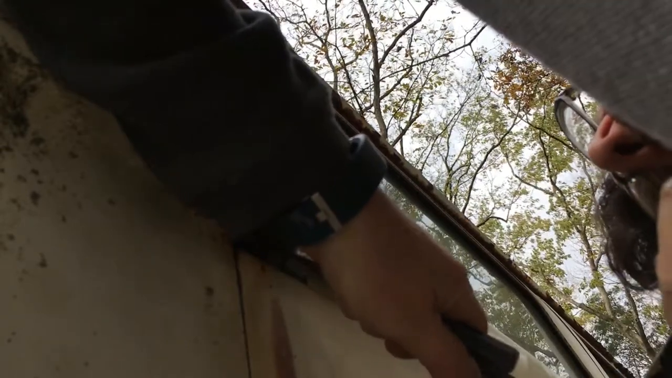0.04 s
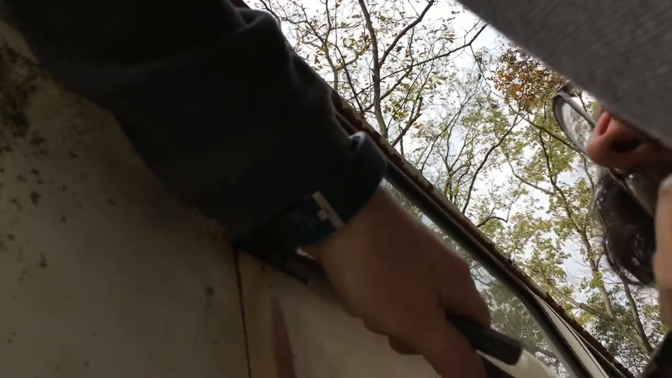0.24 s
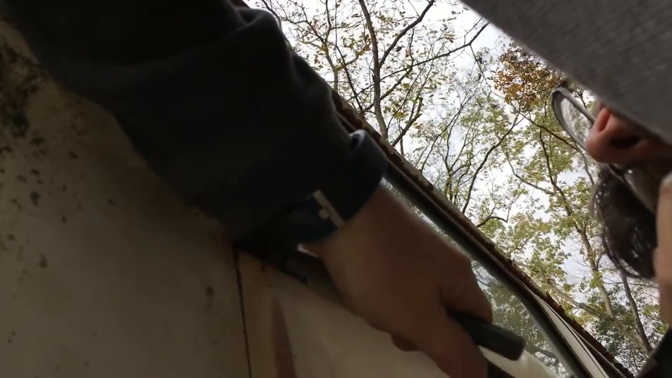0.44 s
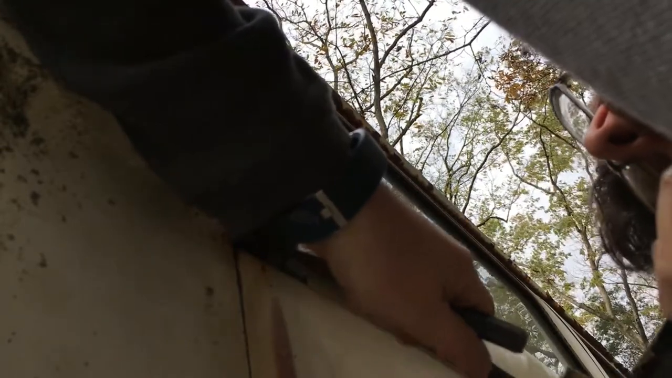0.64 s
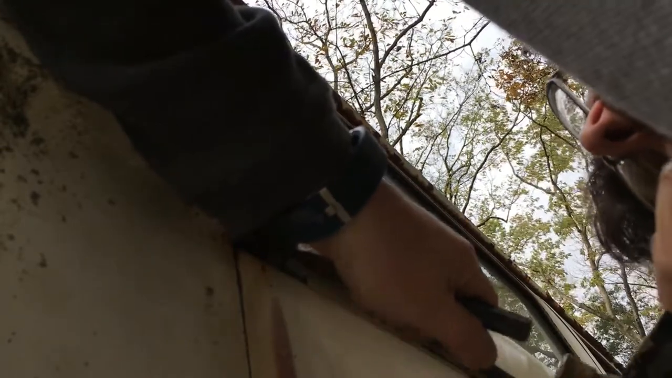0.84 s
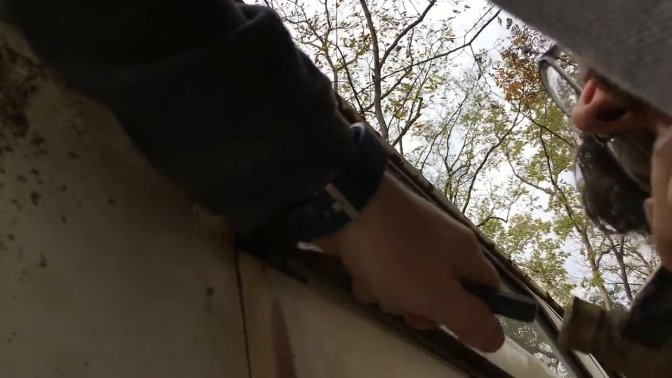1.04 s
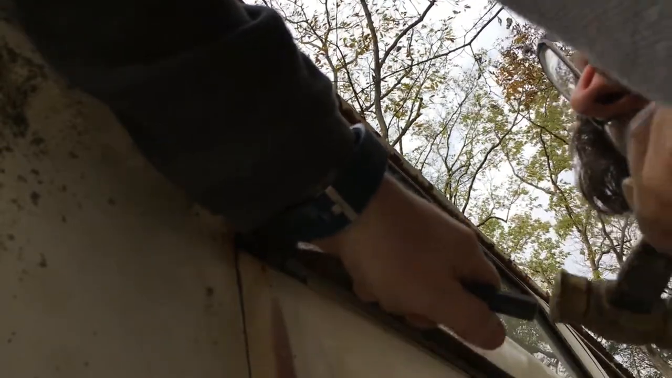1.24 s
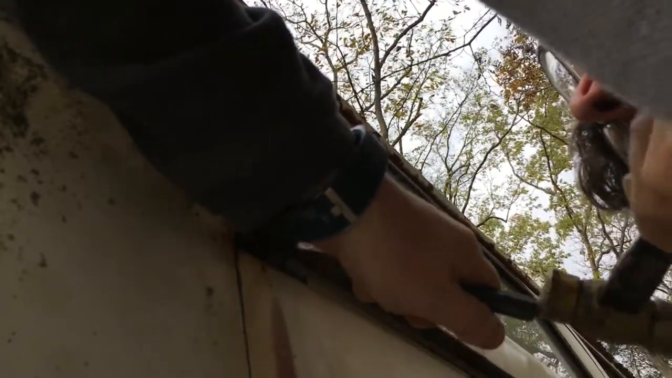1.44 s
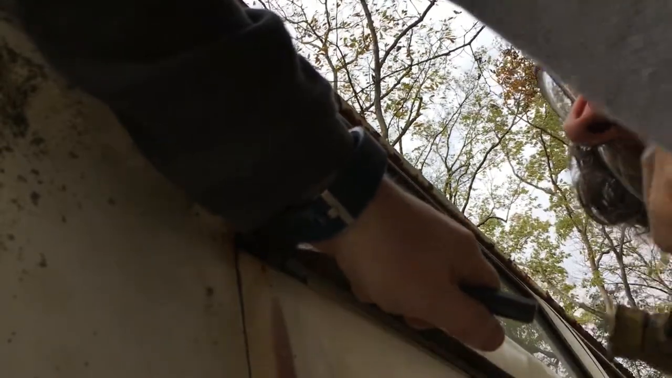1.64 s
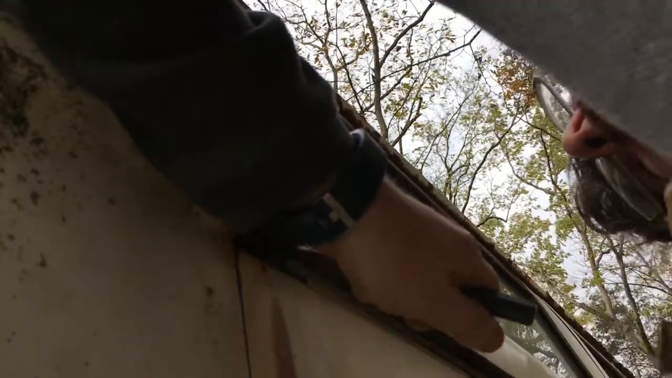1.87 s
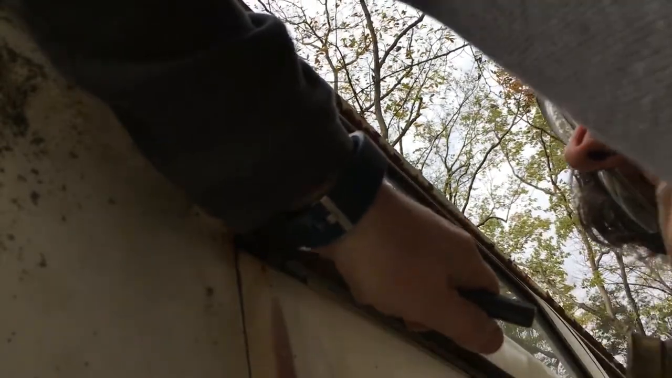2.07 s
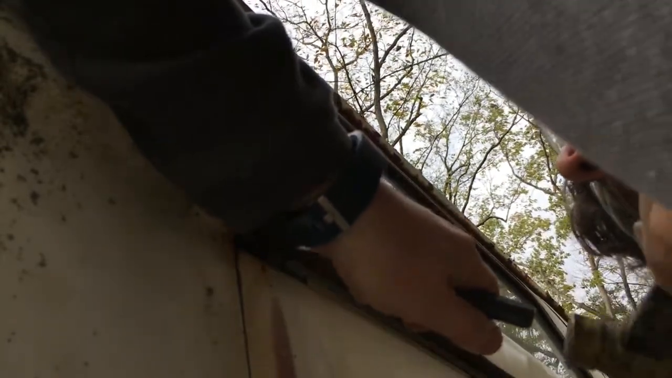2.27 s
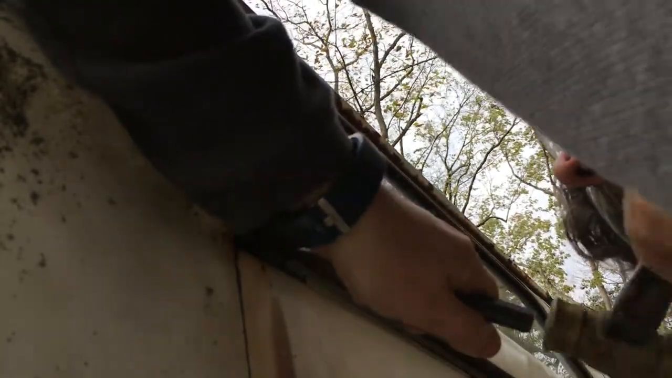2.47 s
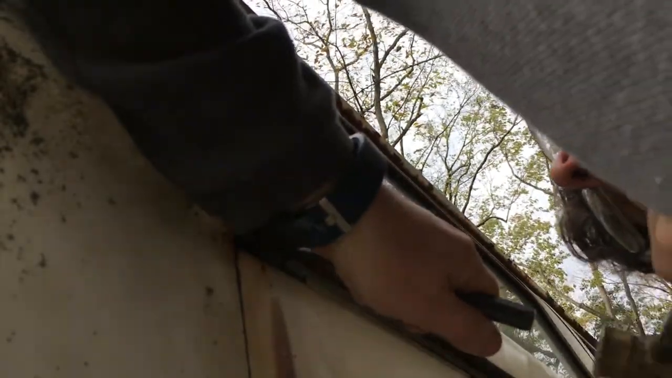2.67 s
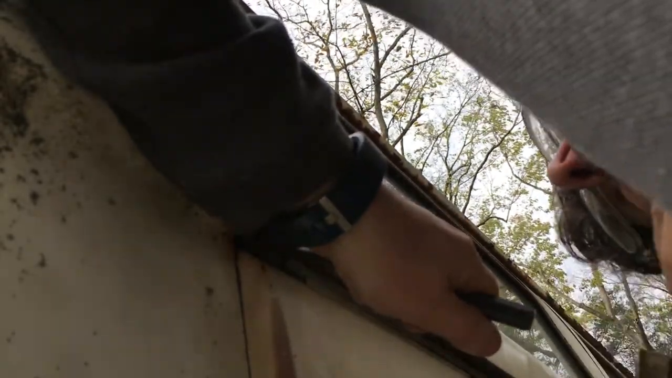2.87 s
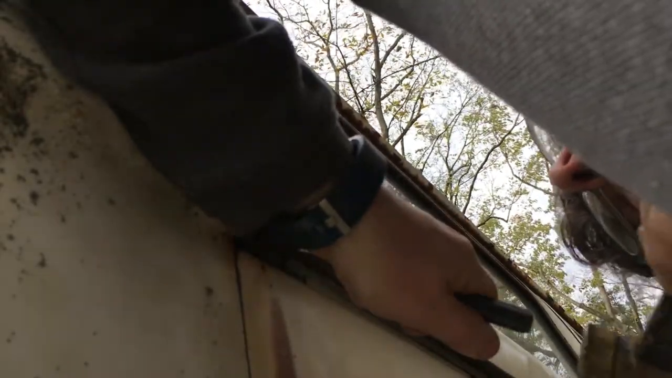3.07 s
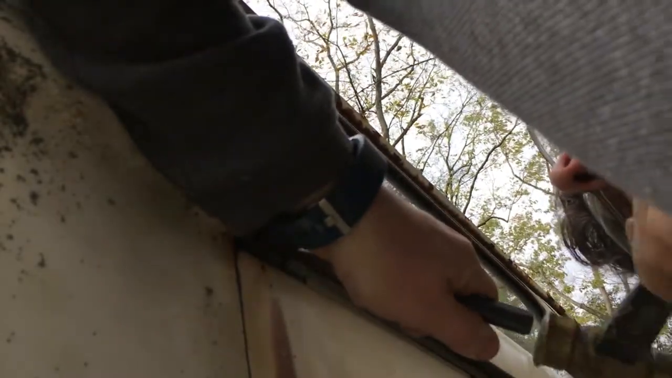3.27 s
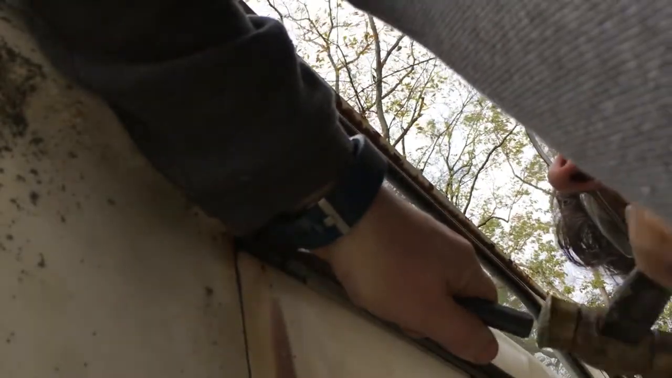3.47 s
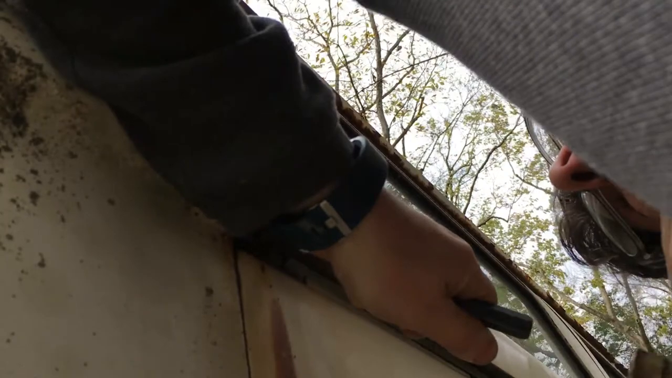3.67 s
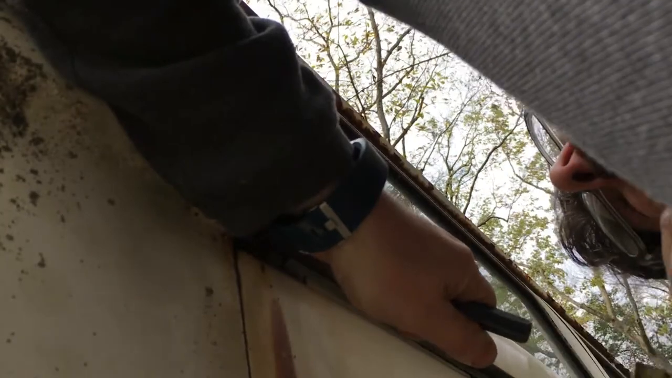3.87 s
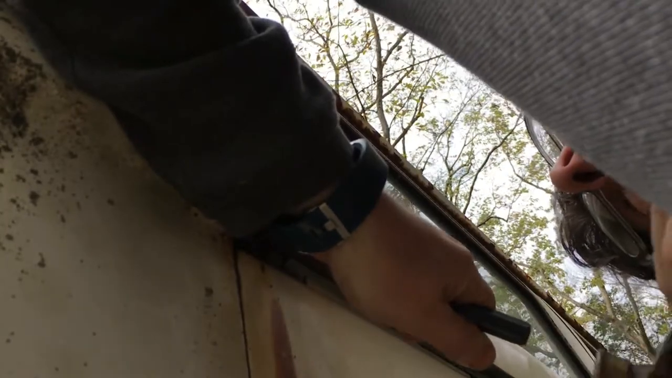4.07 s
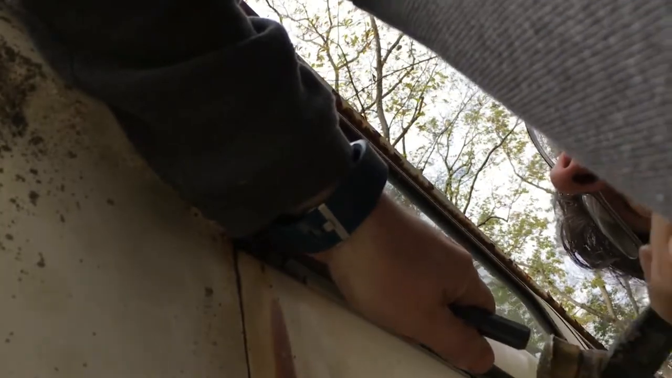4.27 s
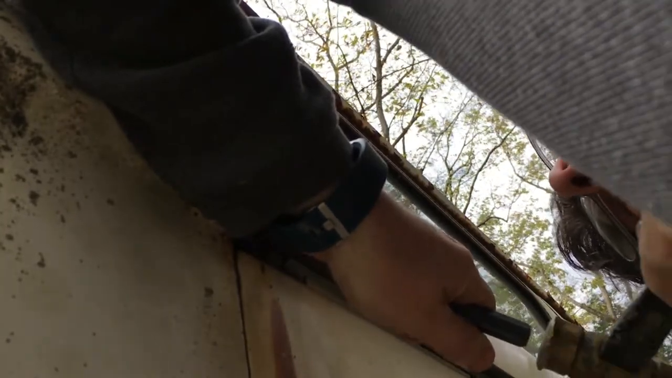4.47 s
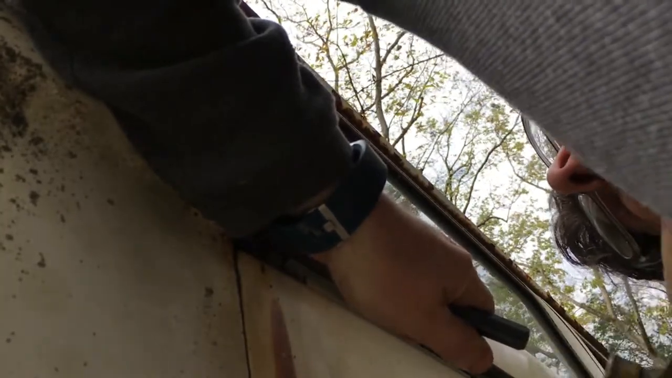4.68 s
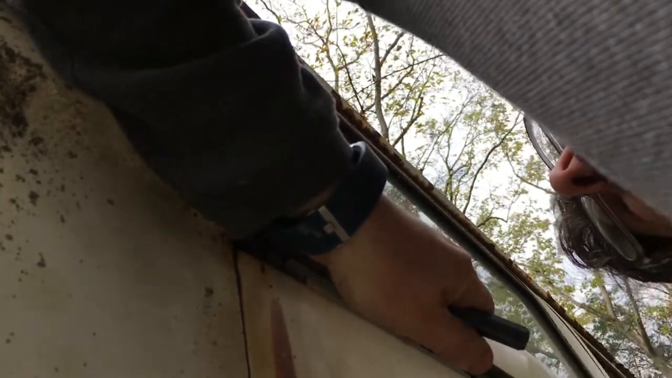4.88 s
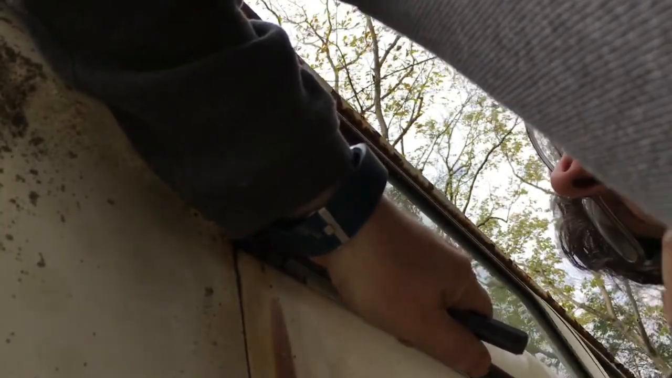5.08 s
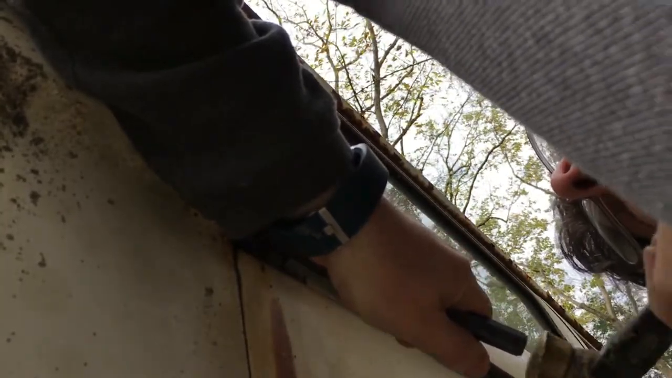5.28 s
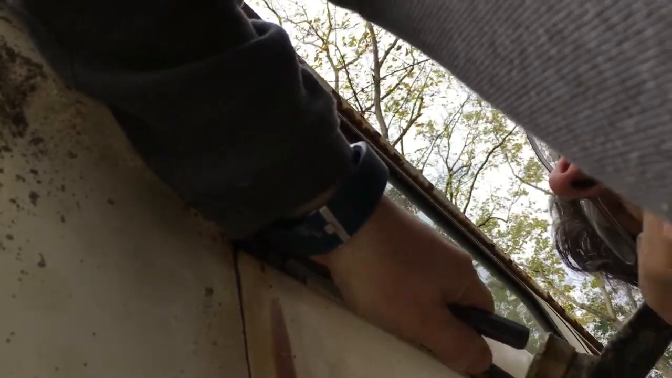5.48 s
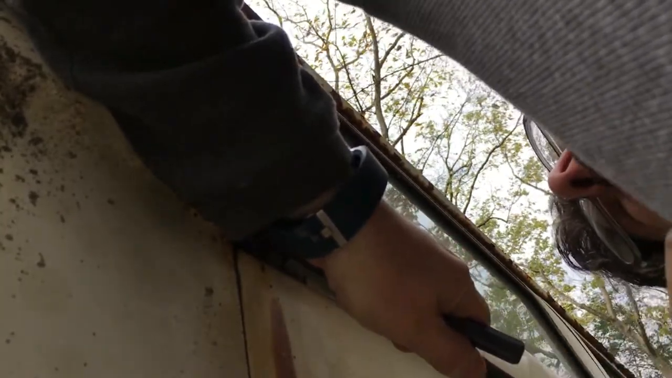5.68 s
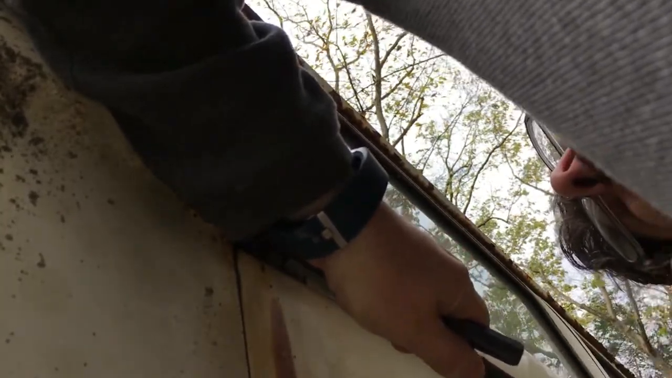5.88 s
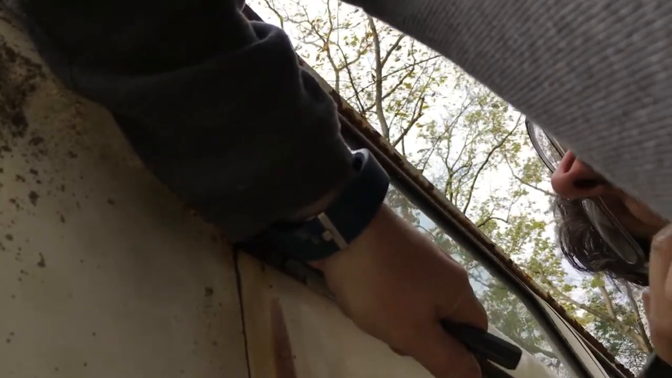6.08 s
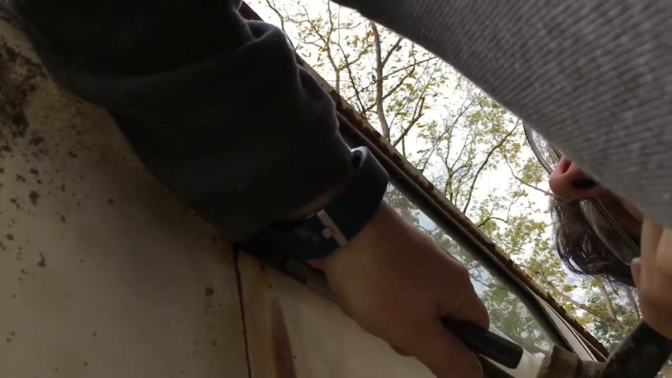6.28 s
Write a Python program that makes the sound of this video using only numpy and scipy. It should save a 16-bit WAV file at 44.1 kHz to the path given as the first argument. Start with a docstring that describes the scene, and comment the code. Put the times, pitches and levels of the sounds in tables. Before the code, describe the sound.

Close mono sound inside an old steel vehicle cab. For the first second there is only faint hiss, low rumble from the hand shifting on the microphone, and soft dull knocks as a chisel tip is set on a seized screw: barely audible at 0.15, clearer at 0.5, a muffled one at 0.6. At 1.1 the hammer lands, a looser, choked, duller blow. From 1.3 firm blows follow every quarter second, very regular and nearly equal in strength, to the last at 6.1. Each is an instant hard steel crack with a short bright chisel ring, mid-range clank of the window frame and a low hollow boom of panels, fading mostly within a quarter second. The tone brightens over the first blows; the chisel ring shifts colour around 4.5. A weak rebound tick follows the blow at 5.6. Loudest peaks are rounded by overload; the low rumble slowly eases.

```python
"""Hammering a stuck screw in a cab

Inside an old vehicle cab, a chisel is set on a seized screw in the window frame and hammered four times a second.
Each blow is a burst of shaped noise (the crack) plus many dying sines: chisel, hammer, frame and cab panels.
Soft knocks come first, as the tip is set on the screw; faint hiss and handling rumble lie underneath.
A close mono microphone is driven to its limit, so the loudest peaks are rounded off."""
import sys
import numpy as np
from scipy import signal
from scipy.fft import rfft, irfft
from scipy.io import wavfile

SR = 44100
rng = np.random.default_rng(int(sys.argv[2]) if len(sys.argv) > 2 else 0)


def output_pcm(signal):
    """Save a mono or channel-first signal as 16-bit PCM at the path in sys.argv[1].

    Samples are clipped to [-1, 1] before scaling.
    """
    pcm = np.clip(np.atleast_2d(signal).T, -1, 1) * 32767
    wavfile.write(sys.argv[1], SR, np.round(pcm).astype(np.int16))


N = 278712
TIME = np.arange(N) / SR   # the whole scene [s]
BLOW_TIME = np.arange(SR * 3 // 5) / SR   # time since one blow or touch [s]


def from_db(db):
    """Turn decibels into a plain gain."""
    return 10 ** (np.asarray(db) / 20)


def rms_one(x):
    """Scale a sound to an rms of 1."""
    return x / np.sqrt(np.mean(x ** 2) + 1e-20)


def at_time(rows, s):
    """Read a table of (time, value) at any moment."""
    return np.interp(s, *np.transpose(rows))


def at_hz(points, hz):
    """Read a table of (frequency, value) at any frequency, along a logarithmic scale."""
    table_hz, value = np.transpose(points)
    return np.interp(np.log(hz), np.log(table_hz), value)


def dying(t, t60):
    """Envelope that starts at t = 0 and falls 60 dB in t60 seconds."""
    return (t >= 0) * np.exp(-np.log(1000) * np.maximum(t, 0) / t60)


def ring(hz, t60, t):
    """A dying sine: one mode, that is one way in which a struck body can swing."""
    return dying(t, t60) * np.sin(2 * np.pi * hz * t)


def bands(lowest_hz, count):
    """Centre frequency and band-pass filter of neighbouring bands up to 17.5 kHz."""
    edges = np.geomspace(lowest_hz, 17500, count + 1)
    return [(np.sqrt(low * high), signal.butter(2, [low, high], "band", fs=SR, output="sos"))
            for low, high in zip(edges, edges[1:])]


def place(times, sounds):
    """Lay each sound on the time line at its moment."""
    out = np.zeros(N + SR)
    for s, sound in zip(times, sounds):
        start = round(s * SR)
        out[start:start + np.size(sound)] += sound
    return out[:N]


def steady_noise(spectrum):
    """Noise with the given colour, rms 1."""
    hz = np.maximum(np.fft.rfftfreq(N, 1 / SR), 1)
    coloured = rfft(rng.standard_normal(N)) * from_db(at_hz(spectrum, hz))
    return rms_one(irfft(coloured, N))


# hammer blows, with one light rebound: (time [s], strength [dB], looseness of the contact [0-1])
HAMMER_BLOWS = [(1.0951, -1.5, 0.9), (1.3194, -0.7, 0.07), (1.571, -0.6, 0), (1.8128, 0, 0),
                (2.0668, -0.4, 0), (2.322, -0.5, 0.05), (2.575, -0.8, 0.1), (2.831, -1, 0.13),
                (3.086, -1.1, 0), (3.3443, -1.5, 0), (3.5933, -1.5, 0.06), (3.8455, -1, 0),
                (4.0809, -0.45, 0.05), (4.3327, -0.94, 0), (4.5793, -1.5, 0), (4.8375, -1, 0.03),
                (5.0925, -1.5, 0), (5.3444, -1.86, 0), (5.5846, -1.1, 0), (5.632, -9.5, 1),
                (5.8477, -1.5, 0), (6.1046, -0.1, 0.1)]


def blow_times():
    """Moments at which the hammer lands [s]."""
    return np.array(HAMMER_BLOWS)[:, 0]


# a fully loose chisel passes on less boom and less treble: (frequency [Hz], level change [dB])
LOOSE_CONTACT_COLOUR = [(110, -6.5), (250, -1), (450, 4.5), (1000, -4), (2000, -0.5), (4200, -0.5),
                        (9500, -13)]
# blow by blow the tip bites into the screw and the sound brightens; colour at first
# and once bitten in, both: (frequency [Hz], level change [dB])
FIRST_BLOW_COLOUR = [(250, 0), (1200, -1.04), (4200, 1), (9500, -6)]
BITTEN_IN_COLOUR = [(250, -0.17), (1200, 0.2), (4200, -0.26), (9500, 3)]
BITE_S = 1.5   # time constant of the change


def force_db(hz):
    """How strongly each blow drives a frequency: its strength, the bite of the tip, the firmness of the contact."""
    times, strength_db, loose = np.transpose(HAMMER_BLOWS)
    fresh = np.exp(-(times - times[0]) / BITE_S)
    bite_db = fresh * at_hz(FIRST_BLOW_COLOUR, hz) + (1 - fresh) * at_hz(BITTEN_IN_COLOUR, hz)
    return strength_db + bite_db + loose * at_hz(LOOSE_CONTACT_COLOUR, hz)


FIRM_DAMPING_DB_PER_S = 11.5
LOOSE_EXTRA_DAMPING_DB_PER_S = 180   # added when the contact is fully loose


def hand_damping():
    """The hand damps every blow a little, on top of its own fading; a loose contact chokes it much sooner."""
    loose = np.array(HAMMER_BLOWS)[:, 2:]
    db_per_s = FIRM_DAMPING_DB_PER_S + LOOSE_EXTRA_DAMPING_DB_PER_S * loose ** 2
    return from_db(-db_per_s * BLOW_TIME)


def struck(modes, level_db, scatter_db, lag_s):
    """Every blow rings the same modes, a little differently; neighbouring modes swing in opposite senses."""
    rings = [(-1) ** k * ring(hz, t60, BLOW_TIME - lag_s) for k, (hz, db, t60) in enumerate(modes)]
    mode_db = np.array([level_db + db + force_db(hz) for hz, db, t60 in modes]).T   # blows by modes
    chance_db = scatter_db * rng.standard_normal(mode_db.shape)
    return from_db(mode_db + chance_db) @ np.array(rings)


# chisel and screw: (frequency [Hz], relative level as first seated [dB], relative level once reseated [dB],
# time to fall 60 dB if left undamped [s])
CHISEL_MODES = [(2443, -22.5, -17.5, 0.11), (2580, -50, -44, 0.037), (3110, -31, -34.5, 0.15),
                (3245, -22.5, -13, 0.067), (3437, -15, -12, 0.04), (3730, -17, -16.5, 0.05),
                (4140, -36, -34, 0.03), (4270, -22.5, -18.5, 0.078), (4611, -13, -16.5, 0.048),
                (5320, -12.5, -64, 0.028), (5520, -17.5, -35.5, 0.068), (5780, -28.5, -6.5, 0.056),
                (6060, -33, -13, 0.084), (5980, -40, -21, 0.037), (6450, -16, -39, 0.052),
                (7030, -40, -54.5, .07), (7660, -45.5, -9.5, 0.065), (8230, -26, -34, 0.1),
                (11000, -34, -41, 0.11)]
# how far the chisel has shifted to its new seat: (time [s], share [0-1])
CHISEL_SEAT = [(1.1, 0.12), (4.0, 0), (4.6, 0.73), (5.6, 0.67), (6.1, 0.4)]


def chisel(level_db, scatter_db, detune):
    """The modes shift in balance as the tip moves in the screw, and in pitch with the grip of the hand."""
    seat = at_time(CHISEL_SEAT, blow_times())
    out = np.zeros((len(HAMMER_BLOWS), len(BLOW_TIME)))
    t = BLOW_TIME[:SR // 5]   # these short rings need only 0.2 s
    for k, (hz, first_db, reseated_db, t60) in enumerate(CHISEL_MODES):
        loudness, grip = rng.standard_normal((len(HAMMER_BLOWS), 2)).T
        seated_db = first_db + seat * (reseated_db - first_db)
        strength = from_db(level_db + seated_db + force_db(hz) + scatter_db * loudness)
        pitch_hz = hz * (1 + detune * grip[:, None])
        out[:, :len(t)] += (-1) ** k * strength[:, None] * ring(pitch_hz, t60, t)
    return out


# hammer head and other loose steel:
# (frequency [Hz], relative level [dB], time to fall 60 dB if left undamped [s])
HAMMER_MODES = [(1355, -41, 0.3), (1420, -55, 0.46), (1690, -38.5, 0.38), (1980, -44, 0.27),
                (2560, -43.5, 0.24), (4330, -43, 0.3), (4520, -47, 0.33), (5700, -43, 0.24),
                (5570, -54, 0.29), (6200, -55, 0.31), (7000, -51, 0.23), (8100, -53, 0.28),
                (8600, -63, 0.33)]


def hammer():
    """Faint lasting ring of the hammer head and other loose steel: a set of dying sines."""
    return struck(HAMMER_MODES, level_db=-3.0, scatter_db=5.5, lag_s=0.0003)


def plate():
    """Undamped ring of a large steel sheet, with modes f = a m^2 + b n^2: the same for every blow."""
    m, n = np.mgrid[1:100, 1:100]   # how many half-waves fit along each side
    hz = 1.9 * m ** 2 + 3.7 * n ** 2
    # a mode swings one way or the other
    sense = np.sign(np.sin(0.71 * m) * np.sin(1.13 * n) * np.sin(1.37 * m) * np.sin(1.79 * n))
    lines = np.bincount(hz.astype(int).ravel(), sense.ravel())[:SR // 2 + 1]   # one bin per hertz
    return rms_one(irfft(-1j * lines, SR)[:len(BLOW_TIME)])   # -1j makes every mode a sine


# steel meets steel: (frequency [Hz], relative level [dB])
CRACK_COLOUR = [(500, -4.5), (1500, 0.5), (3500, -6.5), (6000, -1.5), (8500, -5), (12000, -13),
                (15500, -17.5)]
# the crack thrown back by roof and doors:
# (delay [s], level against the crack [dB], tilt above 3 kHz [dB per octave])
CRACK_REFLECTIONS = [(.0056, -2.5, -4.5), (0.0109, 0.5, -9)]
# the countless weak modes of the steel: (frequency [Hz], relative level [dB])
CLATTER_COLOUR = [(200, -44), (450, -19.5), (650, -6.5), (850, -8), (1100, -8.5), (1400, -11.5), (1900, -4),
                  (2900, -12), (4500, -6), (6500, -18), (9000, -29), (12000, -27.5), (15500, -34.5)]
# how long they last: (frequency [Hz], time to fall 60 dB if left undamped [s])
CLATTER_FADE = [(300, 0.64), (700, 0.22), (2000, 0.14), (4000, 0.11), (8000, 0.12), (15000, 0.094)]
# share of the clatter's power which is alike from blow to blow: (frequency [Hz], share [0-1])
CLATTER_ALIKE = [(400, 0.66), (1800, 0.64), (3500, 0.29), (7000, 0.24), (13000, 0.39)]
# diffuse tail of the cab: (frequency [Hz], relative level [dB])
CAB_TAIL_COLOUR = [(220, 5), (360, -0.5), (520, -19), (1200, -38.5), (2000, -51), (3000, -39), (6000, -41),
                   (8000, -53), (11000, -59), (15500, -62)]


def crack_and_clatter(crack_t60, tail_t60, colour_db):
    """A short crack and its duller reflections, then the dense ring of the steel and a faint tail from the cab."""
    t, sheet, out = BLOW_TIME, plate(), 0
    noise = rng.standard_normal((2, len(HAMMER_BLOWS), len(t)))   # neighbouring bands get unrelated noise
    for k, (hz, band) in enumerate(bands(200.8, count=14)):
        octaves = max(np.log2(hz / 3000), 0)
        crack = dying(t, crack_t60)
        for delay, db, tilt_db in CRACK_REFLECTIONS:
            crack = crack + from_db(db + tilt_db * octaves) * dying(t - delay, crack_t60)
        crack = from_db(at_hz(CRACK_COLOUR, hz)) * crack
        clatter = from_db(at_hz(CLATTER_COLOUR, hz)) * dying(t, at_hz(CLATTER_FADE, hz))
        tail = from_db(at_hz(CAB_TAIL_COLOUR, hz)) * dying(t, tail_t60)
        alike = at_hz(CLATTER_ALIKE, hz)
        same_part = np.sqrt(alike) * clatter * sheet * (-1) ** k
        # unrelated sounds add up by power
        chance_level = np.sqrt(crack ** 2 + (1 - alike) * clatter ** 2 + tail ** 2)
        sound = same_part + chance_level * noise[k % 2]
        # bands that are less alike also vary more in level from blow to blow
        vary_db = colour_db * (1 - alike) * rng.standard_normal(len(HAMMER_BLOWS))
        out = out + signal.sosfilt(band, sound) * from_db(force_db(hz) + vary_db)[:, None]
    return out


# window frame: (frequency [Hz], relative level [dB], time to fall 60 dB if left undamped [s])
FRAME_MODES = [(574.3, -28, 0.19), (593.5, -13.5, 0.078), (596, -34, 0.33), (636, -22.5, 0.14),
               (673, -30, 0.2), (700, -25, 0.25), (767, -23.5, 0.14), (829.4, -16, 0.15),
               (886, -16.5, 0.11), (909.4, -19.5, 0.11), (952, -27, 0.15), (970, -21.5, 0.15),
               (1060, -30.5, 0.28), (1110, -18.5, 0.14), (1200, -44.5, 0.3), (1317.5, -30, 0.29),
               (1370, -32, 0.29), (1414, -29, 0.15), (1520, -42, 0.073), (1543, -29.5, 0.017),
               (1646, -56.5, 0.16), (1700, -33, 0.13), (1747, -24.5, 0.13), (1804, -17.5, 0.15),
               (1884, -14.5, 0.038), (1940, -35.5, 0.31), (1965, -23, 0.12), (2090, -37, 0.12),
               (2280, -32, 0.06), (2393, -21, 0.095)]


def frame():
    """Clank of the steel window frame: dying sines in the middle range."""
    return struck(FRAME_MODES, level_db=-0.53, scatter_db=1.67, lag_s=0.0004)


# sheet panels and the air in the cab, then the sway of the whole cab, both:
# (frequency [Hz], relative level [dB], time to fall 60 dB if left undamped [s])
CAB_MODES = [(55, -32.5, 0.59), (71.5, -32, 1), (92.6, -18.5, 0.32), (100.2, -18, 0.37),
             (127.8, -13.5, 0.21), (152.1, -10, 0.24), (164.9, -37.5, 2.1), (184.2, -11, 0.24),
             (209.5, -6.5, 0.17), (238.6, -8, 0.089), (247.84, -9.5, 0.29), (247.5, -17.5, 0.76),
             (258.9, -21, 0.35), (291.5, -29.5, 1.12), (302.1, -19, 0.16), (346.7, -19.5, 0.34),
             (365, -28, 0.76), (378.5, -19, 0.24), (387.4, -15, 0.17), (397.7, -40, 2.8),
             (443.5, -9, 0.038), (438.6, -15.5, 0.15), (494, -10, 0.01), (521.3, -27.5, 0.28)]
SWAY_MODES = [(32.8, -37.5, 0.28), (43.4, -47, 0.22)]


def cab():
    """Boom of the panels and the air, and the deeper sway of the cab; both start a little after the blow."""
    boom = struck(CAB_MODES, level_db=-0.32, scatter_db=1.02, lag_s=0.0016)
    return boom + struck(SWAY_MODES, level_db=-1.5, scatter_db=10.0, lag_s=0.004)


# the chisel tip is set on the screw: (time [s], level [dB], tilt above 500 Hz [dB per octave])
TIP_TOUCHES = [(0.141, -22, 6), (.159, -7, -2.5), (0.4981, -7, 3), (0.503, 1, -0.5), (.509, -2.5, -6),
               (.613, -8, -18)]
# dull knock of the tip: (frequency [Hz], relative level [dB])
KNOCK_COLOUR = [(100, -21), (190, -12.5), (320, -27), (480, -12), (750, -12), (1300, -32), (2000, -25),
                (3300, -36), (7000, -55), (14000, -66)]
# modes that a light touch wakes in the frame:
# (frequency [Hz], relative level [dB], time to fall 60 dB [s])
TOUCHED_FRAME_MODES = [(456, -37, 0.23), (553, -37.5, 0.13), (642, -38, 0.16), (670, -40.5, 0.24),
                       (777, -36, 0.12), (894, -41, 0.16), (1063, -40, 0.12)]


def touches(knock_t60, scatter_db):
    """Soft knocks of the tip: short noise bursts, which wake only the lower modes of the steel."""
    t = BLOW_TIME
    times, level_db, tilt_db = np.transpose(TIP_TOUCHES)

    def force(hz):
        """Strength of every touch at one frequency."""
        octaves = max(np.log2(hz / 500), 0)
        return from_db(level_db + tilt_db * octaves)[:, None]

    out = 0
    for hz, band in bands(90.5, count=12):
        knock = rng.standard_normal((len(times), len(t))) * dying(t, knock_t60)
        out = out + force(hz) * from_db(at_hz(KNOCK_COLOUR, hz)) * signal.sosfilt(band, knock)
    for k, (hz, db, t60) in enumerate(TOUCHED_FRAME_MODES):
        strength = from_db(db + scatter_db * rng.standard_normal((len(times), 1)))
        out = out + (-1) ** k * force(hz) * strength * ring(hz, t60, t)
    return place(times, out)


# colour of the background hiss: (frequency [Hz], relative level per hertz [dB])
HISS_COLOUR = [(120, -14.5), (200, -2), (316, 4), (519, -7), (1140, -7), (1300, -8.5), (2470, -9.5),
               (4770, -12.5), (5840, -14.5), (9060, -22.5), (16000, -33)]
# its loudness: (time [s], rms level [dB])
HISS_LEVEL = [(0, -51.5), (1.4, -51.5), (3, -54), (6.3, -54.5)]


def hiss():
    """Steady coloured noise that sinks a little once the hammering is under way."""
    return from_db(at_time(HISS_LEVEL, TIME)) * steady_noise(HISS_COLOUR)


# colour of the handling rumble: (frequency [Hz], relative level per hertz [dB])
RUMBLE_COLOUR = [(8.8, -29), (15, -15), (40, -10.5), (60, -5.5), (77, -5), (103, -15), (128, -8.5),
                 (300, -30), (390, -68), (660, -120)]
# the hand shifts on the microphone: (time [s], peak level [dB], half-width [s])
HAND_SHIFTS = [(0.044, -29, .012), (.285, -33.5, .035), (.94, -46, 0.025), (1.5, -38, 0.12)]
RUMBLE_REST_DB, RUMBLE_RISE_DB = -48.5, 7   # level at rest, and its jump at the first blow
SETTLE_DB_PER_S = 1   # the shaking eases as the work goes on


def rumble():
    """Low noise of the hand-held microphone: it rises with the hammering and swells when the hand shifts."""
    working_s = TIME - blow_times()[0]
    shaken_db = (working_s > 0) * (RUMBLE_RISE_DB - SETTLE_DB_PER_S * working_s)
    gain = from_db(RUMBLE_REST_DB + shaken_db)
    for s, db, width in HAND_SHIFTS:
        gain = gain + from_db(db) * np.exp(-((TIME - s) / width) ** 2)
    return gain * steady_noise(RUMBLE_COLOUR)


def scene():
    """The blow travels from the chisel through the frame into the panels; both channels are alike."""
    steel = chisel(level_db=-1.0, scatter_db=3.0, detune=0.0053) + hammer()
    steel = steel + crack_and_clatter(crack_t60=0.014, tail_t60=0.35, colour_db=1.0)
    blows = place(blow_times(), (steel + frame() + cab()) * hand_damping())
    mono = blows + touches(knock_t60=0.097, scatter_db=3.0) + hiss() + rumble()
    return np.stack([mono, mono])


CEILING = 0.98   # no peak gets past this before the filter
CUTOFF_HZ = 15800


def record(dry):
    """The microphone at its limit: the loudest peaks are rounded off and the top of the treble is cut."""
    rounded = dry / (1 + (dry / CEILING) ** 6) ** (1 / 6)
    low_pass = signal.ellip(10, 0.2, 80, CUTOFF_HZ, fs=SR, output="sos")
    return signal.sosfilt(low_pass, rounded)


dry = scene()
out = record(dry)
output_pcm(out)
```